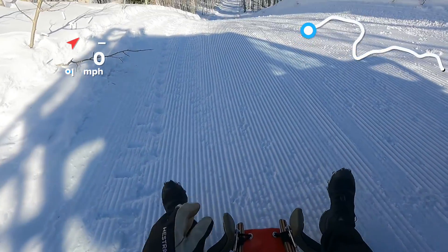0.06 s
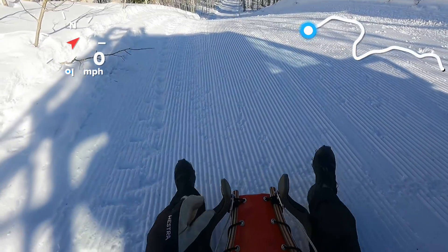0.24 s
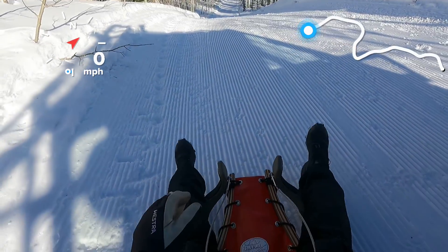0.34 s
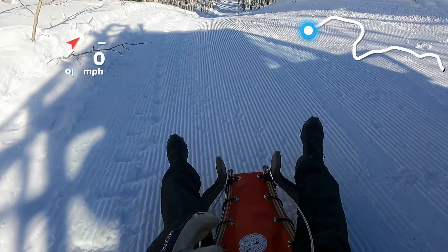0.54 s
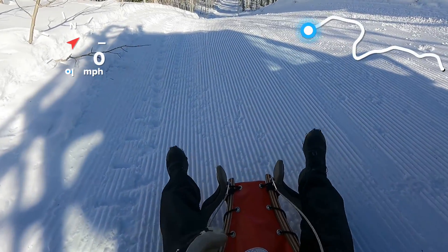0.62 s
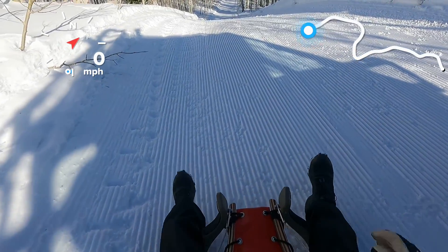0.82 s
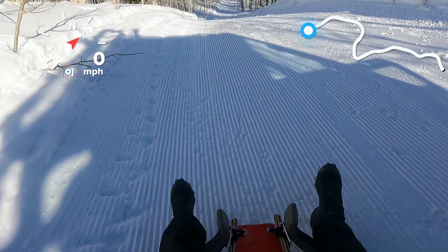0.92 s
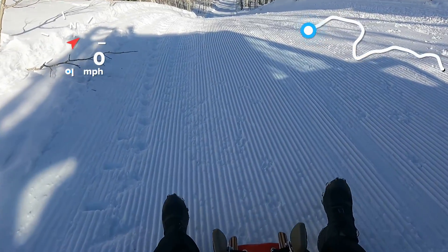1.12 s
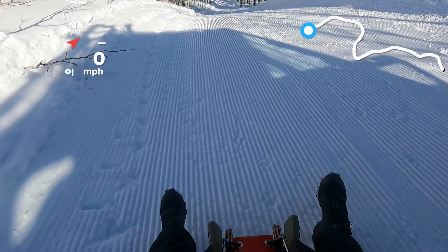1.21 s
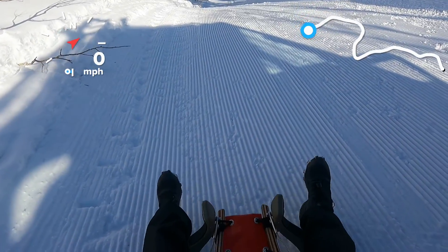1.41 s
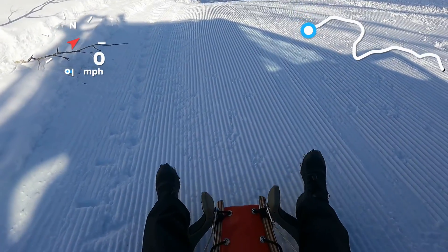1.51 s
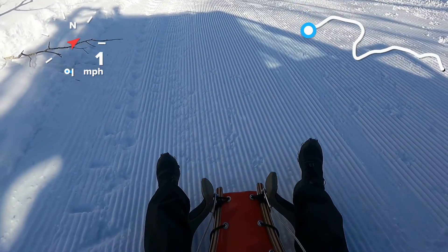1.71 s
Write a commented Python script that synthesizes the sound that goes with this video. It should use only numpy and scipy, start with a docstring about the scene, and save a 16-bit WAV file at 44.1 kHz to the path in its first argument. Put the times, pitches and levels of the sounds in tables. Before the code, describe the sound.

One chattering knock from a sled shifting on snow, with close rustling and soft microphone bumps.

```python
"""A sled frame gives one sharp, chattering knock as its rider shuffles it on groomed snow.
Quick blows crack and ring the loosely jointed frame, and the seat shudders on. Around the knock,
clothing rustles, straps and buckles tick and crumbs of snow snap, over the faint hiss of the slope.
Heard at close range through the two microphone ports of a camera worn on the body: two soft bumps
and a few fainter ones ring its mount above a low handling rumble."""
import sys
import numpy as np
from scipy import signal
from scipy.fft import rfft, irfft
from scipy.io import wavfile

SR = 44100
rng = np.random.default_rng(int(sys.argv[2]) if len(sys.argv) > 2 else 0)


def store_wav(level_fs):
    """Save 16-bit WAV to argv[1]."""
    pcm = np.round(np.clip(np.atleast_2d(level_fs), -1, 1) * 32767)
    wavfile.write(sys.argv[1], SR, pcm.T.astype(np.int16))


N = 77175
T = np.arange(N) / SR
BIN_HZ = np.fft.rfftfreq(2 * N, 1 / SR) + 1  # double-length spectrum, 1 Hz up to avoid log(0)

# how hard clothing and snow are rubbed: time_s, level_db
RUBBING = [(0, -53.5), (.09, -54.5), (.15, -50.5), (.205, -59.5), (.26, -50), (.32, -59.5), (.41, -50),
           (.47, -54.5), (.69, -59), (.75, -63.5), (.835, -67.5), (.865, -50.5), (.99, -46.5), (1.07, -54),
           (1.16, -49), (1.22, -49.5), (1.29, -50), (1.35, -64.5), (1.52, -67.5), (1.66, -58),
           (1.75, -61.5)]


def undb(db):
    """Decibels to gain."""
    return 10 ** (np.asarray(db) / 20)


def unit(x):
    """Scale to rms 1."""
    return x / np.sqrt(np.mean(x ** 2))


def over_hz(table, column=1):
    """A column of a frequency table, interpolated to every bin."""
    rows = np.array(table, float)
    return np.interp(np.log(BIN_HZ), np.log(rows[:, 0]), rows[:, column])


def over_time(table, column=1):
    """A dB column of a time table as a gain per sample."""
    rows = np.array(table, float)
    return undb(np.interp(T, rows[:, 0], rows[:, column]))


def noise(gain):
    """Noise of rms 1, shaped by a gain per bin."""
    phases = np.exp(2j * np.pi * rng.random(N + 1))
    return unit(irfft(gain * phases)[:N])


def coloured(table):
    """Noise of rms 1, shaped by rows of freq_hz, density_db."""
    return noise(undb(over_hz(table)))


def band(hz, width_hz):
    """Noise in a steep-sided resonance."""
    offset = (BIN_HZ / hz - hz / BIN_HZ) * hz / width_hz
    return noise(1 / (1 + offset ** 2 / 2) ** 2)


def steadied(x):
    """Flatten the chance swells and fades of a rumble, keeping it low-pitched."""
    flat = x / np.sqrt(np.abs(signal.hilbert(x)) ** 2 + .3)
    return unit(signal.sosfilt(signal.butter(4, 380, fs=SR, output="sos"), flat))


def wander(rate_hz):
    """Random drift of rms 1."""
    return unit(np.interp(T * rate_hz, np.arange(4096), rng.standard_normal(4096)))


def waver(hz, spread_hz, rate_hz):
    """A vibration of rms 1 whose pitch wanders."""
    cycles = rng.random() + np.cumsum(hz + spread_hz * wander(rate_hz)) / SR
    return np.sqrt(2) * np.sin(2 * np.pi * cycles)


def strike(start_s, rise_s, t60_s):
    """Envelope: a smooth rise, then exponential decay."""
    age = T - start_s
    attack = np.sin(np.pi / 2 * np.clip(age / rise_s, 0, 1))
    return attack * np.exp(-np.log(1000) * np.maximum(age - rise_s, 0) / t60_s)


def swells(table):
    """Envelope: a bell-shaped swell for each row of peak_s, half_width_s, level_db."""
    return sum(undb(db) * np.exp(-((T - at) / width) ** 2) for at, width, db in table)


def slope_hiss():
    """The slope hisses faintly behind everything."""
    # colour of the hiss: freq_hz, density_db
    colour = [(200, -2.5), (420, 1), (580, -2), (700, -32.5), (840, -14.5), (980, 1.5), (1200, -2.5),
              (1600, 5), (2200, -8), (2700, -6), (3400, -7), (4500, -3.5), (5400, -10), (6500, -16),
              (8000, -27), (14000, -63)]
    # its slow rise and fall: time_s, level_db
    levels = [(0, -68.5), (.45, -59), (.78, -65.5), (1.1, -56), (1.4, -59), (1.75, -55.5)]
    return over_time(levels) * coloured(colour)


def handling_rumble():
    """The rider's movement sways the camera, shifts it in surges and keeps its mount trembling."""
    # the jacket shifts the camera: peak_s, half_width_s, level_db, pitch_hz
    shifts = [(0.14, 0.026, -39.5, 34), (0.689, 0.013, -52, 90), (0.846, 0.012, -37, 76),
              (1.49, 0.047, -46.5, 31), (1.703, 0.072, -49, 31)]
    # strength of the rumble: time_s, sway_db, buzz_db
    levels = [(0, -40, -52.5), (.12, -52.5, -48.5), (.25, -26, -60), (.33, -41.5, -48.5), (.42, -43, -45),
              (.47, -43, -34.5), (.57, -31, -46.5), (.68, -49.5, -44.5), (.76, -43.5, -62),
              (.83, -43.5, -43.5), (.94, -38, -57.5), (1.03, -34.5, -41), (1.09, -39, -49),
              (1.16, -24.5, -39), (1.24, -32.5, -32.5), (1.32, -19, -70), (1.42, -42, -69),
              (1.57, -51, -86), (1.75, -43.5, -84)]
    # slow sway of the camera: freq_hz, density_db
    sway_colour = [(6, -2), (14, 6), (25, -1.5), (40, -13.5), (60, -25), (100, -47.5), (250, -69.5),
                   (1000, -84)]
    # buzz of the mount: freq_hz, density_db
    buzz_colour = [(30, -22), (65, -6), (97, 5), (130, -14.5), (200, -13.5), (400, -28.5), (1000, -65)]
    surges = sum(swells([(at, width, db)]) * waver(hz, spread_hz=4.8, rate_hz=10)
                 for at, width, db, hz in shifts)
    sway = over_time(levels, column=1) * steadied(coloured(sway_colour))
    buzz = over_time(levels, column=2) * steadied(coloured(buzz_colour))
    return surges + sway + buzz


def snow_crunch():
    """Crumbs of packed snow snap under the sled, more loudly the harder it rubs."""
    # resonances of one crumb: pitch_hz, level_db, t60_s
    modes = [(1246, 1, 0.0071), (2587, 0, 0.019), (4074, -8, 0.0055), (4750, -0.5, 0.0028)]
    snaps_per_s, scatter_db, mix_db = 170, 4, -7.5
    snaps = rng.random(N) < snaps_per_s / SR
    strengths = undb(scatter_db * np.clip(rng.standard_normal(N), -2, 2))
    crumb = sum(undb(db) * strike(0, .00073, t60) * np.sin(2 * np.pi * hz * T) for hz, db, t60 in modes)
    crunch = unit(signal.fftconvolve(snaps * strengths, crumb)[:N])
    return undb(mix_db) * over_time(RUBBING) * crunch


def rustle():
    """Grainy friction of clothing and snow, with dull sleeve drags and bright jacket swishes."""
    # colour of the friction: freq_hz, density_db
    friction_colour = [(150, 2), (380, -9.5), (560, -9), (770, -15.5), (1180, 4.5), (1650, -3.5),
                       (2130, -17), (2600, -12), (3200, -13), (3750, -21), (4400, -11), (5300, -29.5),
                       (6000, -29.5), (6700, -24), (8000, -43.5), (10000, -66.5), (14000, -57.5)]
    # a sleeve drags close to the microphone: peak_s, half_width_s, level_db
    drags = [(.255, 0.036, -58), (1.2, 0.083, -44.5)]
    # colour of a drag: freq_hz, density_db
    drag_colour = [(100, -32.5), (350, 9.5), (700, -0.5), (1500, 8.5), (2500, -7), (6000, -21.5),
                   (12000, -67)]
    # light swishes of jacket fabric: peak_s, half_width_s, level_db
    swishes = [(.15, 0.054, -55), (.25, 0.039, -56.5), (1.155, 0.021, -52)]
    # colour of a swish: freq_hz, density_db
    swish_colour = [(800, -33), (1800, 12), (3000, -1.5), (4800, 6), (6800, -12.5), (9000, -27.5),
                    (14000, -50)]
    grain_db, flicker_db = 1, .8
    grain = unit(undb(grain_db * wander(rate_hz=509.3) + flicker_db * wander(rate_hz=45.6)))
    friction = over_time(RUBBING) * coloured(friction_colour)
    sleeve = swells(drags) * coloured(drag_colour)
    jacket = swells(swishes) * coloured(swish_colour)
    return grain * (friction + sleeve + jacket)


def gear_ticks():
    """Straps and buckles tick, each in a short, unsteady resonance with a faint wider splash."""
    # ticks and scuffs of the gear: start_s, level_db, pitch_hz, t60_s
    ticks = [(0.112, -42.5, 2620, 0.015), (0.455, -44, 1230, 0.026), (.5565, -39, 4550, .012),
             (0.6225, -46, 4650, 0.011), (0.6703, -42, 4600, 0.013), (0.711, -45.5, 1270, 0.087),
             (0.9495, -38, 2650, 0.02), (.95, -46, 4900, .016), (0.9657, -42.5, 5300, 0.022),
             (0.967, -59, 8160, 0.012), (0.981, -46, 5200, 0.017), (1.0105, -45, 2520, .025),
             (1.015, -41, 1270, .03), (1.0342, -41, 2640, 0.02), (1.2425, -42.5, 2450, 0.024)]
    out = 0
    for at, db, hz, t60 in ticks:
        tone = waver(hz, spread_hz=200, rate_hz=2000)
        splash = undb(-12) * band(hz, width_hz=2000)
        out += undb(db) * strike(at, .0008, t60) * (tone + splash)
    return out


def mount_bumps():
    """Each soft push rings the camera mount and scuffs the cloth under it."""
    # pushes on the mount: start_s, level_db, length_s, scuff_db
    bumps = [(0.3696, -3.5, 0.0057, -39.5), (.799, -28.5, 0.0073, -73), (0.891, -29.5, 0.0057, -57),
             (1.008, -25, 0.0079, -66.5), (1.2705, -8, 0.0052, -32.5)]
    # colour of the scuffed cloth: freq_hz, density_db
    scuff_colour = [(100, 14.5), (200, -7.5), (330, 9), (560, 15.5), (800, -28), (1500, -9.5),
                    (2500, -19.5), (12000, -53.5)]
    mount_hz, mount_t60_s, scuff_lead_s = 98.1, .12, .0021
    mount_ring = np.cos(2 * np.pi * mount_hz * T) * np.exp(-np.log(1000) * T / mount_t60_s)
    out = 0
    for at, db, length, scuff_db in bumps:
        push = np.sin(np.pi * np.clip((T - at) / length, 0, 1))
        thump = signal.fftconvolve(push / push.sum(), mount_ring)[:N]
        scuff = strike(at - scuff_lead_s, rise_s=.00078, t60_s=.028) * coloured(scuff_colour)
        out += undb(db) * thump + undb(scuff_db) * scuff
    return out


def rattle(depth_db=2.8, rate_hz=130):
    """Quick flutter of level from loose joints."""
    return unit(undb(depth_db * wander(rate_hz)))


def ringing(blows, rise_s, t60_s):
    """Envelope of a resonance that sums the energy of all the blows."""
    return np.sqrt(sum((undb(db) * strike(at, rise_s, t60_s)) ** 2 for at, _, db, _, _ in blows))


def frame_knock():
    """Each blow cracks, rings the sled frame's modes and feeds a rattling wash; the seat shudders on."""
    # blows on the frame: start_s, crack_db, ring_db, crack_t60_s, crack_tilt_db_per_octave
    blows = [(0.4816, 1.5, -10, 0.03, -0.15), (0.4857, -5.5, -18.5, 0.041, -4),
             (0.4927, -7, -6, 0.015, 1.5), (.5000, -18.5, 2.5, 0.04, -9.5), (0.5119, -20, -10, 0.054, 4),
             (.5180, -7.5, -19, 0.025, -1.5), (0.5715, -29.5, -25.5, 0.046, 2.5)]
    # colour of a crack: freq_hz, density_db
    crack_colour = [(150, -8), (380, -11.5), (720, -30.5), (1400, 4), (1950, -10.5), (2300, 1.5),
                    (2600, -3.5), (3000, 3), (3500, -10.5), (4150, -4.5), (4750, -6), (5150, -25),
                    (5700, -5), (6400, -15.5), (7000, -39), (7600, -18), (8300, -30.5), (9700, -31.5),
                    (12000, -44.5), (14500, -52)]
    # strong modes of the frame: pitch_hz, level_db, t60_s
    modes = [(364, -9, .19), (468, -13, .28), (548, -13, .26), (758, -20, .28), (925, -13, .18),
             (1225, -8.5, .16), (1278, -2, .16), (1322, -4.5, .14), (1451, -1.5, .115), (1485, -6.5, .12),
             (1553, -3.5, .115), (1659, 2.5, .13), (1867, -7.5, .16), (2570, -12, .1), (2880, -8, .08),
             (3072, -9.5, .1), (4091, -11, .08), (4760, -9, .07), (4860, -9, .095)]
    # wash of its many weak modes: centre_hz, level_db, t60_s
    wash = [(407, -48.5, 0.37), (750, -44.5, 0.37), (1413, -41.5, 0.44), (2790, -47, 0.42),
            (4380, -38, 0.2), (7000, -69, .25)]
    # shudder of the seat: pitch_hz, spread_hz, level_db, rise_s, t60_s
    shudder = [(122, 10, -32.5, .02, .15), (92, 7, -29, .08, .17), (180, 45, -39.5, .035, .55),
               (262, 24, -38, .075, .3), (345, 50, -45, .08, .4)]
    crack_mix_db, ring_mix_db, rise_cycles, jitter_rad_per_khz = -15, -27, 2.5, .27
    octaves = np.log2(BIN_HZ / 1000)
    out = 0
    for at, db, _, t60, tilt in blows:
        crack = noise(undb(over_hz(crack_colour) + tilt * octaves))
        out += undb(crack_mix_db + db) * strike(at, .0017, t60) * crack
    for hz, db, t60 in modes:
        phase = 2 * np.pi * (hz * T + rng.random())
        jitter = jitter_rad_per_khz * hz / 1000 * wander(rate_hz=170)
        envelope = ringing(blows, rise_cycles / hz, t60) * rattle()
        out += undb(ring_mix_db + db) * envelope * np.sin(phase + jitter)
    flutter = rattle()  # the whole wash rattles together
    for hz, db, t60 in wash:
        out += undb(db) * flutter * ringing(blows, .003, t60) * band(hz, width_hz=.64 * hz)
    first_blow_s = blows[0][0]
    for hz, spread, db, rise, t60 in shudder:
        out += undb(db) * strike(first_blow_s, rise, t60) * rattle() * waver(hz, spread, rate_hz=hz / 3)
    return out


def sources():
    """Spectrum of everything around the rider, with fresh randomness on each call."""
    mix = (frame_knock() + gear_ticks() + mount_bumps() + rustle()
           + snow_crunch() + slope_hiss() + handling_rumble())
    return rfft(mix, 2 * N)


def scene():
    """The sound reaches two microphone ports at unequal level and phase, along with a diffuse share."""
    # the pair of ports: freq_hz, left_minus_right_db, left_lead_rad
    ports = [(100, .3, 0), (330, 1, .05), (520, 4, .25), (720, 7.5, -.9), (1300, 3, -.7), (1800, 2, -.75),
             (2350, 5, -1), (2850, 0, -.8), (3550, 4.5, -1.25), (3950, 1, .3), (4600, -7, -.2),
             (5600, -3.5, .05), (6700, -2, 0), (7600, 5.5, .45), (8800, 1, 0), (10000, 4.5, .2)]
    # diffuse share against the direct sound: freq_hz, level_db
    diffuse_share = [(100, -40), (300, -14.5), (700, -4), (1400, -47.5), (3700, -8), (5500, -31.5),
                     (9000, -3.5)]
    sides = np.array([[1], [-1]])  # left, right
    port_gain = undb(sides * over_hz(ports, column=1) / 2)
    port_phase = np.exp(.5j * sides * over_hz(ports, column=2))
    direct = sources()
    diffuse = undb(over_hz(diffuse_share)) * sources()
    return irfft(port_gain * port_phase * (direct + sides * diffuse))[:, :N]


def record(dry):
    """The camera cuts the treble steeply above 14.5 kHz."""
    return signal.sosfilt(signal.ellip(8, .2, 70, 14500, fs=SR, output="sos"), dry)


dry = scene()
out = record(dry)
store_wav(out)
```